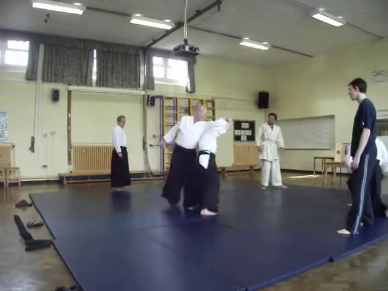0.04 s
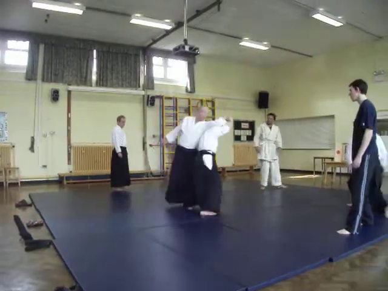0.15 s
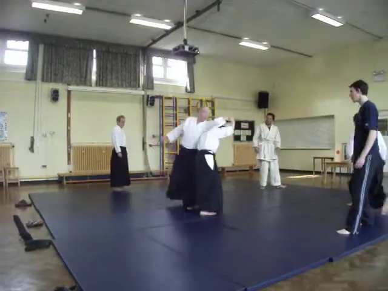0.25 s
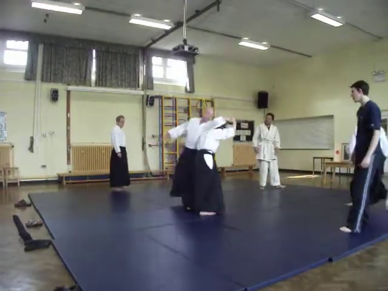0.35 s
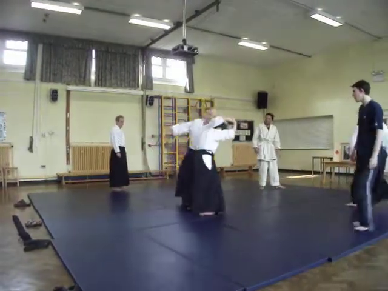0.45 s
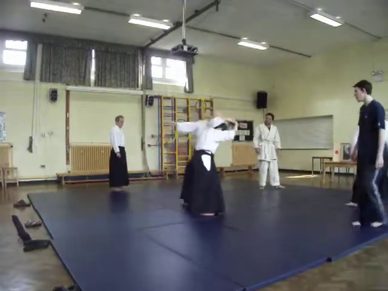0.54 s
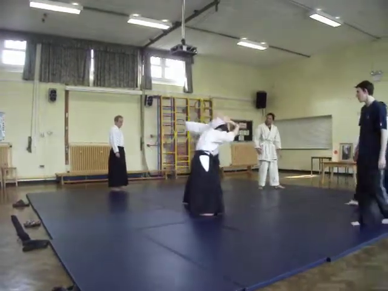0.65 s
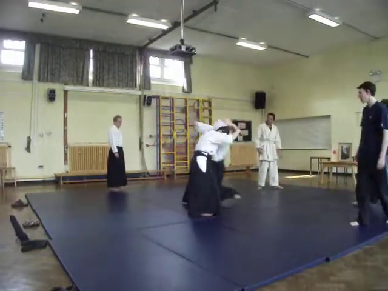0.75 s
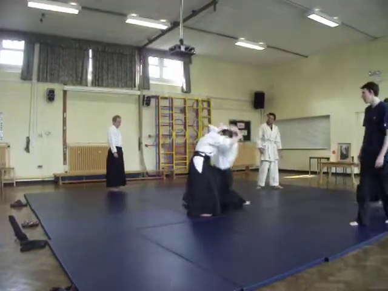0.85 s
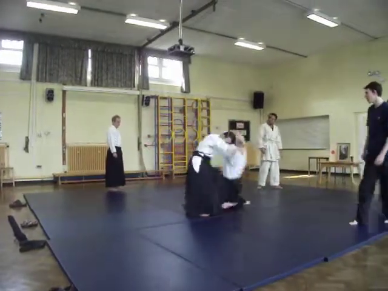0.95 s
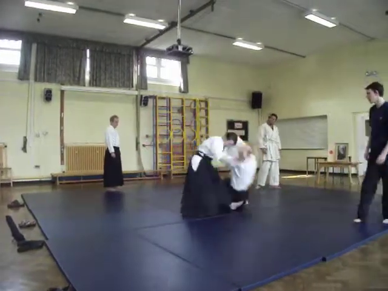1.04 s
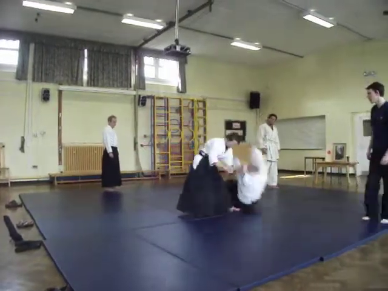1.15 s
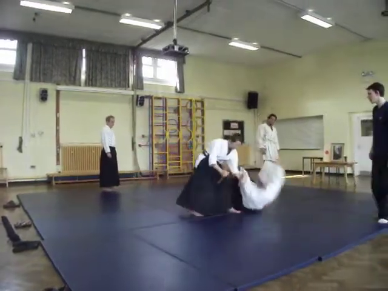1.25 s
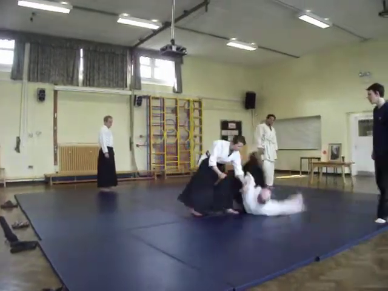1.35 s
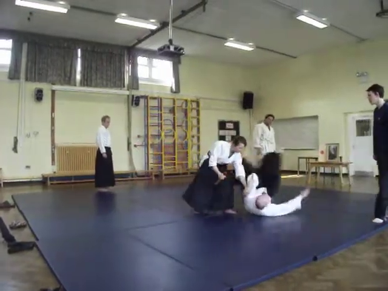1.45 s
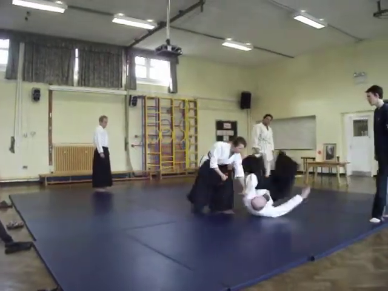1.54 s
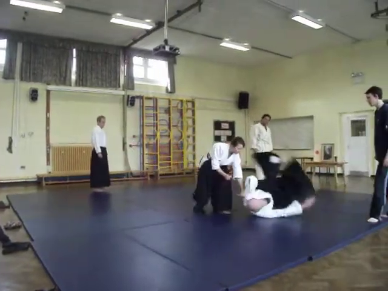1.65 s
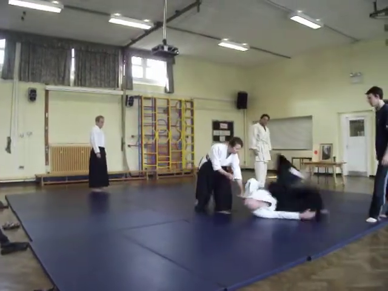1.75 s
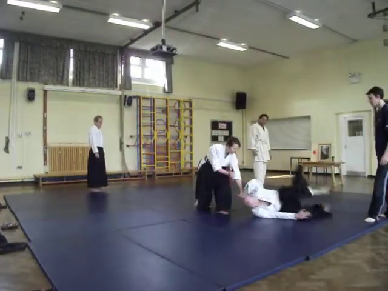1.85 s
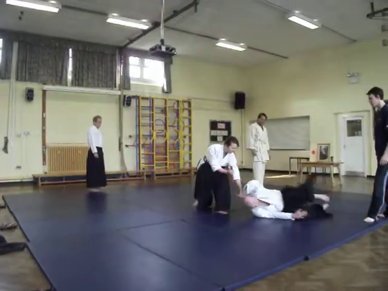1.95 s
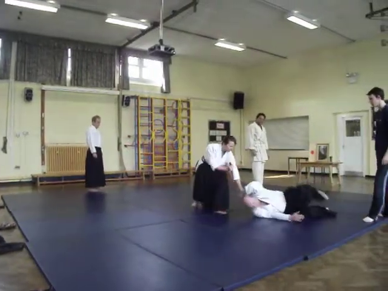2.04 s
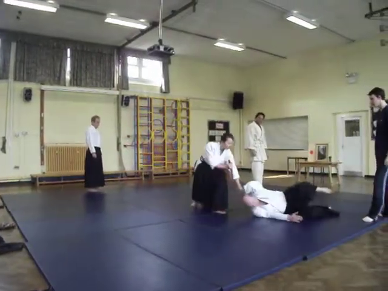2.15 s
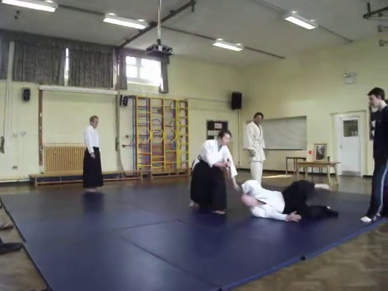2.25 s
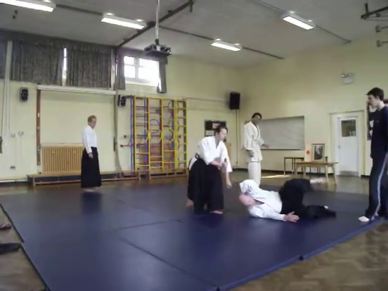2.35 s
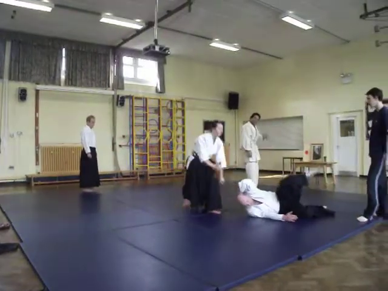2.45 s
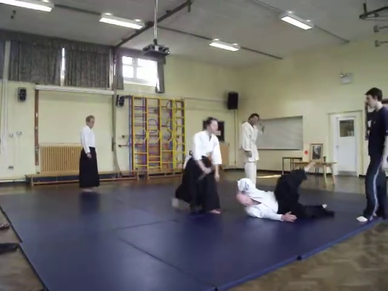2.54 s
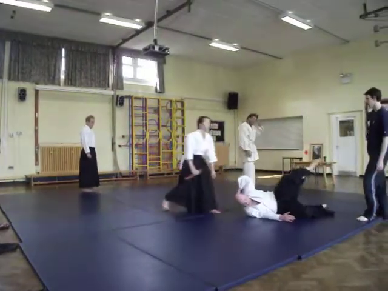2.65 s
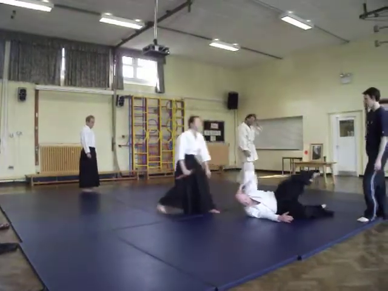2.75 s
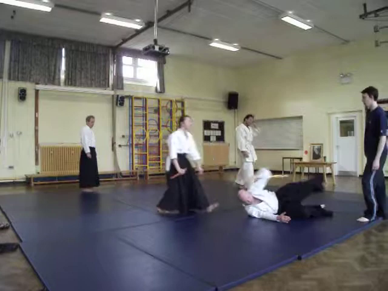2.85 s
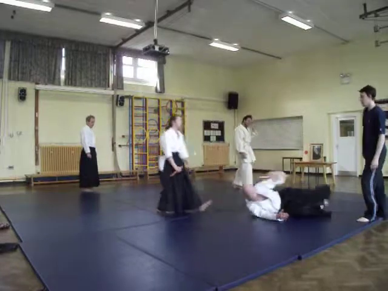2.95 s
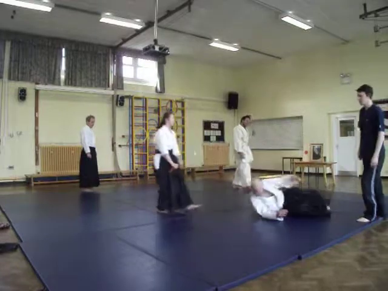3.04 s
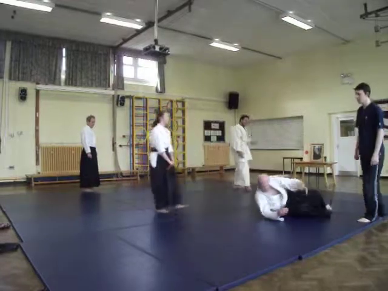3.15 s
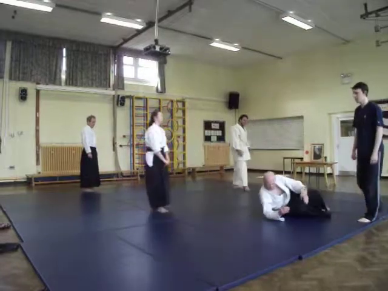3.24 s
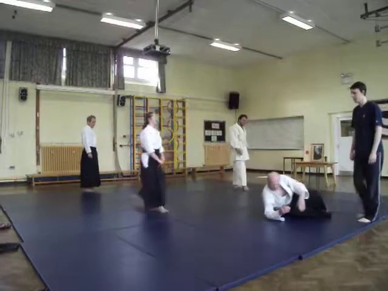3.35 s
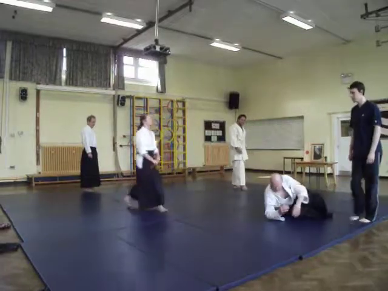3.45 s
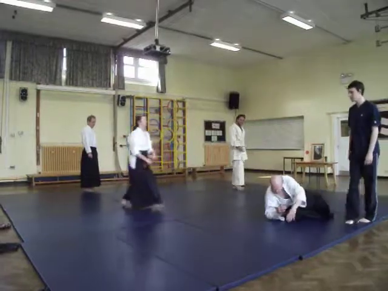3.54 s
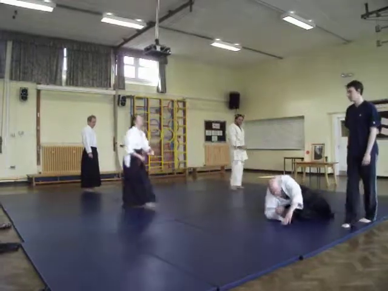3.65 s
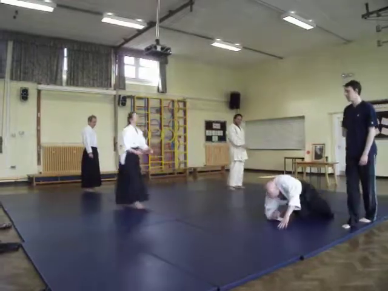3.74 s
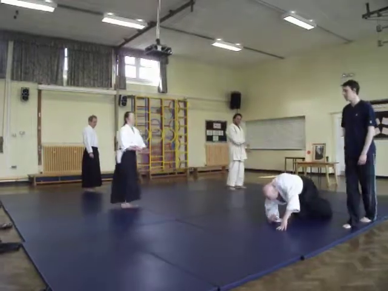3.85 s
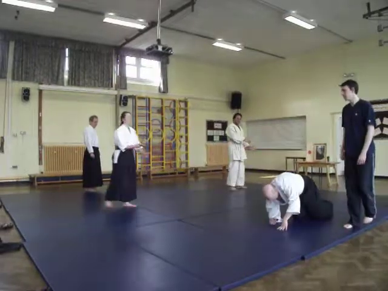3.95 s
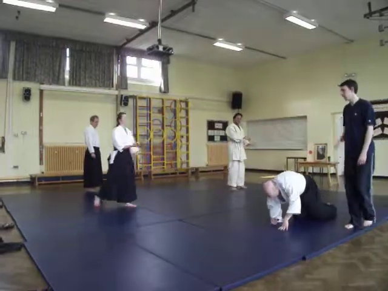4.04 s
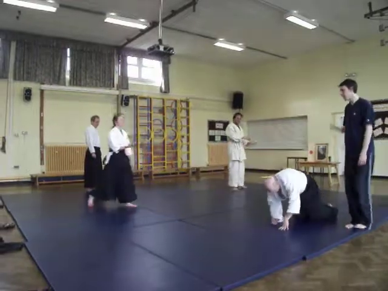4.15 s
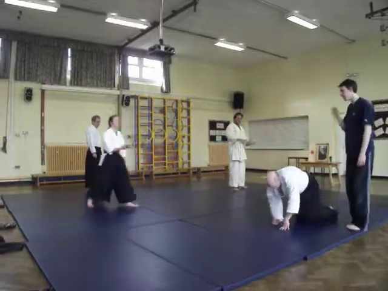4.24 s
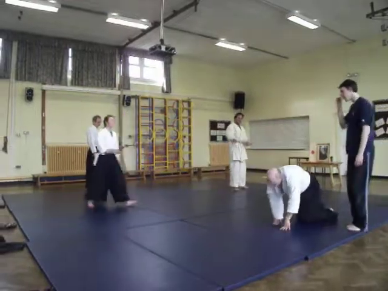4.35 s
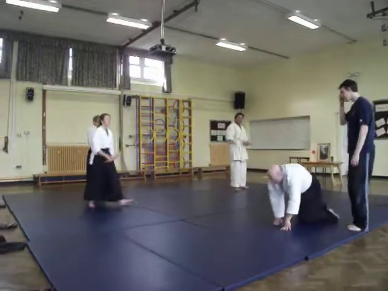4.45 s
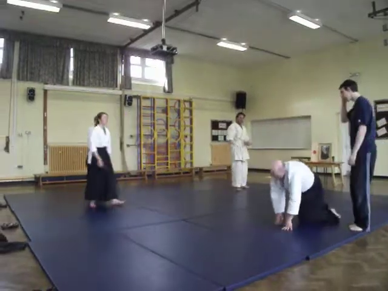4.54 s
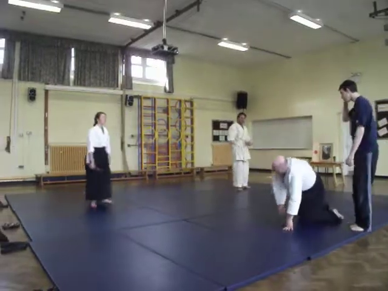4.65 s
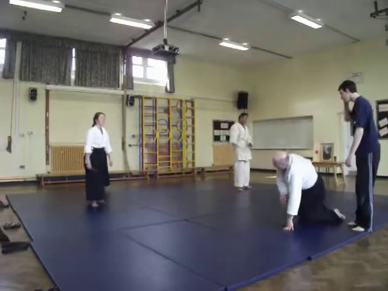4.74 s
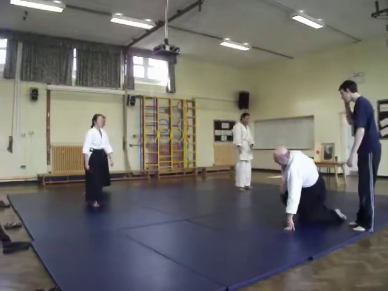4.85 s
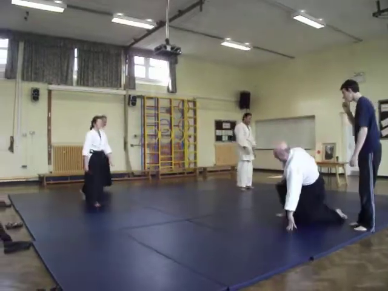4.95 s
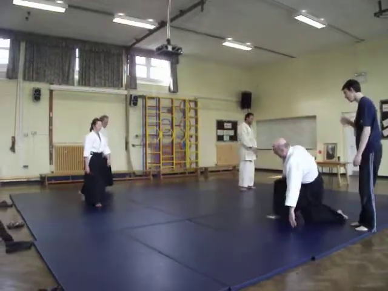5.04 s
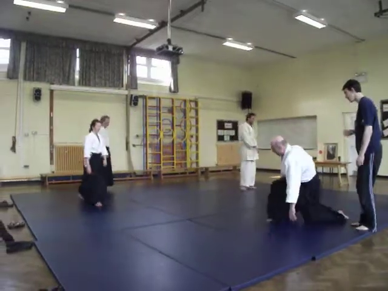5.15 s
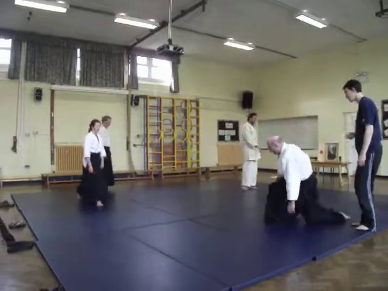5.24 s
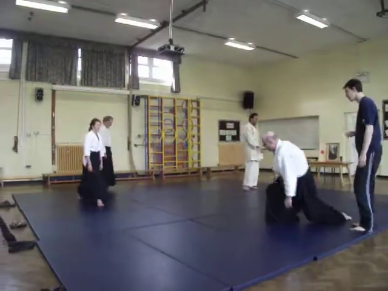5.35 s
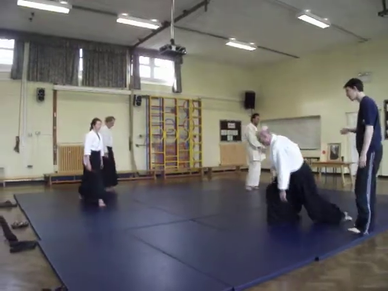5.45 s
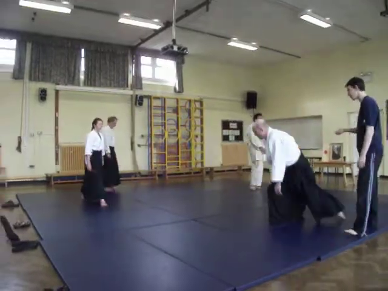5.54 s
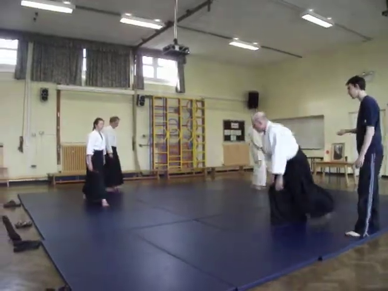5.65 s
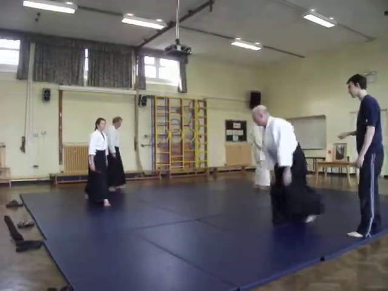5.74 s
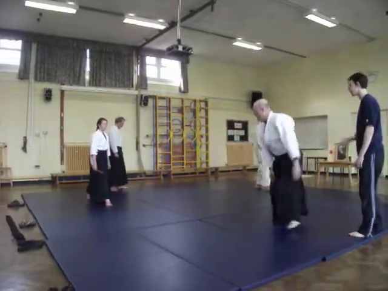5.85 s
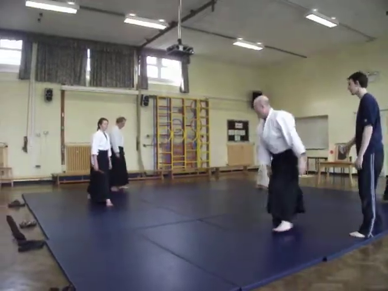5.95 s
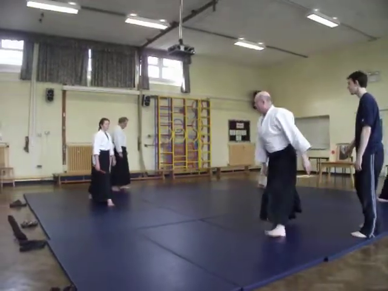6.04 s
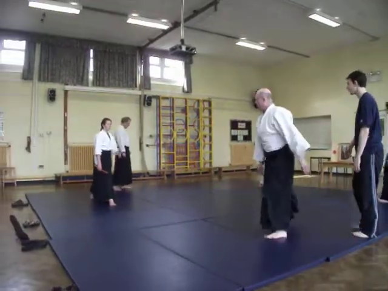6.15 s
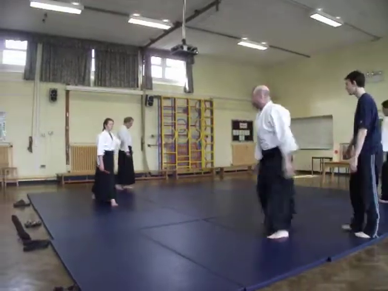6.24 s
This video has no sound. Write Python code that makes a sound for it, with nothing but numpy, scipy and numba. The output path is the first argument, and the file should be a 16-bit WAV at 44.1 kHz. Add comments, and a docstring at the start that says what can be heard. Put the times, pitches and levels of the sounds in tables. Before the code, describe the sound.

Steady airy room noise and microphone hiss fill a reverberant gym hall. From about 0.5 seconds, bare feet make a few soft, hollow thumps on a padded mat. At 1.3 seconds a body lands with a sharp smack and a heavy, booming thud through the wooden floor; the legs slap down around 1.7 to 1.9 seconds. This is by far the loudest event: the small microphone distorts, its level dips and slowly recovers, and the hall rings for over a second. A lighter thump and scuff come at 2.8 seconds. From 3 seconds on, heavy cotton swishes and crackles faintly as the person gets up, with two low floorboard bumps by 3.5 seconds, small ticks of sticky soles and soft steps near 4.6 and 6 seconds. A soft rush of air grows in the second half, joined by a faint low drone near the end.

```python
"""Airy room noise and bare footfalls in a gym hall, then a throw: a body slaps on a mat, the legs follow.
The impact passes through the padding and excites the damped modes of the wooden floor; the hall rings on.
As the faller gets up, soft steps thump in the foam, heavy cotton rustles and sticky soles tick.
A small camera's peaky, hissing microphone turns its gain down, overloads and slowly recovers."""
import sys
import numpy as np
from scipy import signal
from scipy.fft import rfft, irfft
from scipy.io import wavfile
from scipy.ndimage import uniform_filter1d
from numba import njit

SR = 44100
rng = np.random.default_rng(int(sys.argv[2]) if len(sys.argv) > 2 else 0)


def wav_out(sig):
    """Save sig, one row per channel (or a flat mono array), as 16-bit PCM at SR to the path in sys.argv[1]."""
    wavfile.write(sys.argv[1], SR, np.round(np.clip(np.atleast_2d(sig).T, -1, 1) * 32767).astype(np.int16))


N = 278226
TIME = np.arange(N) / SR


def undb(db):
    """Decibels to amplitude ratio."""
    return 10 ** (np.asarray(db) / 20)


def at_level(x, db):
    """Scale to an rms level."""
    return x * undb(db) / np.std(x)


def on_log_axis(hz, points):
    """Interpolate (frequency_hz, value) points along log frequency."""
    points_hz, values = np.transpose(points)
    return np.interp(np.log(np.maximum(hz, 1)), np.log(points_hz), values)


def colour(x, response, size=8192):
    """Minimum-phase filter: folding the cepstrum makes a (frequency_hz, gain_db) response causal."""
    gain = undb(on_log_axis(np.fft.rfftfreq(size, 1 / SR), response))
    cepstrum = irfft(np.log(gain))
    cepstrum[1:size // 2] *= 2
    cepstrum[size // 2 + 1:] = 0
    impulse_response = irfft(np.exp(rfft(cepstrum)))
    return signal.fftconvolve(x, impulse_response)[:N]


def resonate(x, centre_hz, width_hz):
    """Damped resonance: one mode, with unit gain at its centre."""
    return signal.lfilter(*signal.iirpeak(centre_hz, centre_hz / width_hz, fs=SR), x)


def add(track, start_s, sound):
    """Superposition: mix a sound in at a time."""
    start = int(start_s * SR)
    track[start:start + len(sound)] += sound[:N - start]


def burst(decay_s, size=8192):
    """Exponential decay: many tiny contacts sum to a dying noise of unit energy."""
    noise = rng.standard_normal(size) * np.exp(-TIME[:size] / decay_s)
    return noise / np.linalg.norm(noise)


def swell(start_s, rise_s):
    """Linear rise in amplitude, then a hold."""
    return np.clip((TIME - start_s) / rise_s, 0, 1)


# spectrum of ventilation and outdoor air: frequency_hz, level_db
AIR_SPECTRUM = [(20, 14), (45, 8), (85, 12), (130, 4.5), (220, 4.5), (400, 1.5), (700, -1), (1060, -1),
                (1450, -3), (1850, -7), (2700, -1.5), (5500, -4)]
def room_air():
    """Broadband flow noise, steady; two narrow bands, a soft rush and a low drone, swell near the end."""
    drone = at_level(resonate(rng.standard_normal(N), centre_hz=82, width_hz=18), db=-34)
    rush = at_level(resonate(rng.standard_normal(N), centre_hz=1020, width_hz=360), db=-42)
    steady = at_level(colour(rng.standard_normal(N), AIR_SPECTRUM), db=-31.5)
    return steady + drone * swell(start_s=5.51, rise_s=1) + rush * swell(start_s=3.36, rise_s=1.9)


# reverberation time of the hall: frequency_hz, t60_s
HALL_DECAY = [(50, 1.85), (130, 1.32), (300, 1.1), (800, 1.28), (2500, 1.21), (6000, 1.13)]
def hall_tail(build_s):
    """Reverberation: diffuse echoes build up, then decay, slowest in the bass; unit energy."""
    t, tail = TIME[:2 * SR], 0
    spectrum, hz = rfft(rng.standard_normal(len(t))), np.fft.rfftfreq(len(t), 1 / SR)
    for band_hz, t60_s in HALL_DECAY:
        band = on_log_axis(hz, [(f, f == band_hz) for f, _ in HALL_DECAY])
        tail += irfft(spectrum * band) * np.exp(-np.log(1000) * t / t60_s)
    tail *= 1 - np.exp(-t / build_s)
    return tail / np.linalg.norm(tail)


def in_hall(direct, tail, wet_db):
    """Convolution with the hall's tail adds the reverberant field to the direct sound."""
    return direct + undb(wet_db) * signal.fftconvolve(direct, tail)[:N]


# strength of the rustle, greater once the throw is over: time_s, gain
RUSTLE_ENVELOPE = [(2.6, .4), (3.2, 1)]
def cotton_rustle(scatter_db, decay_s, count=70):
    """Random impulse noise: stiff cotton crackles faintly and unevenly."""
    crackle = np.zeros(N)
    for when, strength in rng.random((count, 2)):
        add(crackle, when * TIME[-1], undb(scatter_db * strength) * burst(decay_s))
    activity = np.interp(TIME, *np.transpose(RUSTLE_ENVELOPE))
    return at_level(crackle * activity, db=-43.5)


# sleeves and wide trousers sweeping past each other: peak_s, level_db
CLOTH_SWEEPS = [(.22, -38), (3.22, -39), (4.3, -39.5), (4.698, -48.5), (5.5, -46.5)]
def cloth_swishes(centre_hz, width_hz, grain_db, half_width_s):
    """Sliding friction: cloth on cloth makes a grainy hiss that swells and fades with each sweep."""
    sweeps = sum(undb(db) * np.exp(-((TIME - peak_s) / half_width_s) ** 2) for peak_s, db in CLOTH_SWEEPS)
    catches = at_level(uniform_filter1d(rng.standard_normal(N), size=200), db=0)
    friction = rng.standard_normal(N) * undb(grain_db * catches)
    return sweeps * at_level(resonate(friction, centre_hz, width_hz), db=0)


# the clearest snaps of cloth and soles: start_s, relative_level_db
CREASES_AND_PEELS = [(0.677, -15.5), (1.0034, -14), (3.09, -12), (3.7947, -13), (4.23, -14), (4.981, -15),
                     (5.4303, -10.5), (5.486, -10), (5.821, -13.5), (5.922, -20)]
def ticks(gain_db, decay_s):
    """Broadband transients: creasing cloth and peeling soles snap with no weight behind them."""
    out = np.zeros(N)
    for start_s, db in CREASES_AND_PEELS:
        add(out, start_s, undb(db + gain_db) * burst(decay_s))
    return out


# deep bumps of the boards: start_s, level_db
HEEL_BUMPS = [(3.071, -30), (3.5, -31.5)]
def board_bumps(pitch_hz, rise_s):
    """Damped oscillation: a heel rocks the boards for a few slow cycles."""
    out, t = np.zeros(N), TIME[:SR // 2]
    envelope = t / rise_s * np.exp(1 - t / rise_s)
    for start_s, db in HEEL_BUMPS:
        add(out, start_s, undb(db) * envelope * np.sin(2 * np.pi * pitch_hz * t))
    return out


# spectrum of cloth and skin on vinyl: frequency_hz, gain_db
COVER_RESPONSE = [(60, -18), (250, 0), (600, 5.5), (1200, 5), (2000, -2), (3000, 5.5), (3800, 2.5),
                  (5200, -8)]
def mat_contacts(contacts):
    """Impact excitation: each contact pushes with its weight and slaps or scuffs the cover."""
    force, slap = np.zeros(N), np.zeros(N)
    for start_s, weight_db, skin_db, decay_s in contacts:
        add(force, start_s, undb(weight_db) * burst(decay_s))
        add(slap, start_s, undb(skin_db) * burst(decay_s))
    return force, colour(slap, COVER_RESPONSE)


# a sole sinking into foam: frequency_hz, gain_db
FOAM_RESPONSE = [(30, -15), (80, 0), (125, -6), (170, 4), (235, -2.5), (310, 0), (450, -9.5), (620, -19),
                 (1200, -30)]
# bare feet, hands and knees on the mat: start_s, relative_thud_db, relative_scuff_db, decay_s
FOOTFALLS = [(.553, -11, -31.5, 0.047), (.792, -10.5, -18.5, 0.041), (1.09, -17.5, -26.5, 0.081),
             (1.295, -12.5, -23, 0.059), (2.712, -19, -28, 0.036), (2.776, -11.5, -14, 0.14),
             (3.28, -21.5, -33.5, 0.1), (4.644, -19.5, -26, 0.057), (6.02, -22, -37.5, .045)]
def footsteps(thud_db, scuff_db, roll_s, ball_db):
    """Cushioned impact: the heel, then the softer ball of the foot, each thump hollowly in the foam."""
    balls = [(start_s + roll_s, weight_db + ball_db, skin_db + ball_db, decay_s)
             for start_s, weight_db, skin_db, decay_s in FOOTFALLS]
    force, scuff = mat_contacts(FOOTFALLS + balls)
    return undb(thud_db) * colour(force, FOAM_RESPONSE) + undb(scuff_db) * scuff


# hands, back and soles landing flat: start_s, relative_level_db, centre_hz
FLAT_HITS = [(0.7975, -4, 1730), (1.3415, 25.5, 5070), (1.7144, 15.5, 4680), (1.862, 5, 4380),
             (2.7757, -3.5, 2890), (5.441, -7, 850)]
def smacks(gain_db, decay_cycles, width_share, width_halving_db):
    """Air expulsion: a flat contact squeezes out a brief pulse; the harder the hit, the sharper its peak."""
    out = np.zeros(N)
    for start_s, db, centre_hz in FLAT_HITS:
        width_hz = centre_hz * width_share * .5 ** (db / width_halving_db)
        pulse = burst(decay_cycles / centre_hz)
        add(out, start_s, undb(db + gain_db) * resonate(pulse, centre_hz, width_hz))
    return out


# modes of the mat and sprung floor: pitch_hz, width_hz, gain_db
FLOOR_MODES = [(29, 22, -3), (57.4, 20.2, 2.5), (82.7, 29, 3), (136, 40, 2.5), (169, 13.5, 2),
               (198, 38, -4), (271, 60, -3), (410, 140, -13)]
# back, hips and legs landing on the mat: start_s, relative_thud_db, relative_slap_db, decay_s
BODY_IMPACTS = [(1.343, 2, -7, 0.011), (1.372, 11, -5.5, 0.09), (1.408, 1.5, -3, 0.082),
                (1.458, 3.5, -1.5, 0.087), (1.522, 9.5, -12.5, 0.012), (1.565, 7, 0, 0.099),
                (1.714, 4.5, -4, .015), (1.75, 2.5, .5, 0.044), (1.779, 2.5, 2, 0.086), (1.845, 4, -4, .04)]
def body_landing(thud_db, slap_db, pad_cutoff_hz):
    """Forced vibration: the body's weight drives the floor's modes; the padding acts as a low-pass."""
    force, slap = mat_contacts(BODY_IMPACTS)
    boards = sum((-1) ** k * undb(db) * resonate(force, pitch_hz, width_hz)  # modes alternate in sign
                 for k, (pitch_hz, width_hz, db) in enumerate(FLOOR_MODES))
    thud = signal.sosfilt(signal.butter(2, pad_cutoff_hz, fs=SR, output="sos"), boards)
    return undb(thud_db) * thud + undb(slap_db) * slap


def scene():
    """Superposition of all sources; landing, feet and small sounds share one reverberant field."""
    tail = hall_tail(build_s=0.017)
    landing = in_hall(body_landing(thud_db=40, slap_db=23.5, pad_cutoff_hz=533), tail, wet_db=-0.5)
    feet = in_hall(footsteps(thud_db=37, scuff_db=26, roll_s=0.042, ball_db=-4), tail, wet_db=0.5)
    crackle = ticks(gain_db=17.5, decay_s=0.0032) + cotton_rustle(scatter_db=24.5, decay_s=0.0018)
    creases = resonate(crackle, centre_hz=3560, width_hz=3100)
    swishes = cloth_swishes(centre_hz=2760, width_hz=1300, grain_db=4.5, half_width_s=0.14)
    hits = smacks(gain_db=17, decay_cycles=3.2, width_share=0.67, width_halving_db=12.5)
    # the small, sharp sounds reach the microphone mostly direct
    small_sounds = in_hall(creases + swishes + hits, tail, wet_db=-23.5)
    bumps = board_bumps(pitch_hz=42.5, rise_s=0.034)
    return (room_air() + small_sounds + bumps + feet + landing)[None]


@njit
def follow_envelope(rectified, attack_s, release_s):
    """Envelope detection: a one-pole smoother with separate time constants for rise and fall."""
    out, envelope = np.empty(len(rectified)), 0.
    for i in range(len(rectified)):
        lag_s = attack_s if rectified[i] > envelope else release_s
        envelope += (rectified[i] - envelope) / (lag_s * SR)
        out[i] = envelope
    return out


def gain_control(x, knee_db, attack_s, release_s):
    """Compression: the gain falls as the envelope nears and passes the knee."""
    envelope = follow_envelope(np.abs(x), attack_s, release_s)
    return x / np.hypot(1, envelope / undb(knee_db))


# hiss of the electronics: frequency_hz, level_db
HISS_SPECTRUM = [(30, -11.5), (600, -16.5), (1500, -7.5), (1800, 3.5), (2200, -7.5), (2800, 4.5),
                 (3600, -1), (5200, 1)]
# response of the microphone behind its port: frequency_hz, gain_db
MIC_RESPONSE = [(15, 1), (40, 0.5), (1550, -1), (1850, 4), (2150, 3.5), (2500, 8), (2920, 5), (3350, -3),
                (3850, -9.5), (4400, -14), (5100, -16), (5600, -18.5), (6500, -17.5)]
# the camera's narrow passband: frequency_hz, gain_db
CAMERA_BAND = [(5200, 0), (5600, -6), (5950, -16), (6450, -65)]
def record(dry):
    """Saturation: the coloured, compressed sound clips; band limiting overshoots, so it clips again."""
    ceiling, top_hz = 0.71, 15900
    sound = gain_control(colour(dry[0], MIC_RESPONSE), knee_db=-2.5, attack_s=0.0036, release_s=1.41)
    self_noise = colour(rng.standard_normal(N), HISS_SPECTRUM)
    hiss = at_level(colour(self_noise, MIC_RESPONSE), db=-35.5)
    overloaded = np.clip(sound + hiss, -ceiling, ceiling)
    narrow = colour(overloaded, CAMERA_BAND)
    clipped = np.clip(narrow, -ceiling, ceiling)
    low_pass = signal.ellip(8, .2, 70, top_hz, fs=SR, output="sos")
    return signal.sosfilt(low_pass, clipped)[None]


dry = scene()
out = record(dry)
wav_out(out)
```